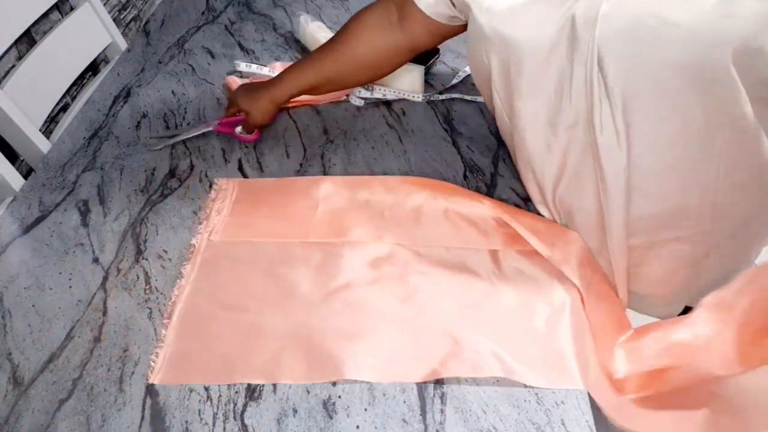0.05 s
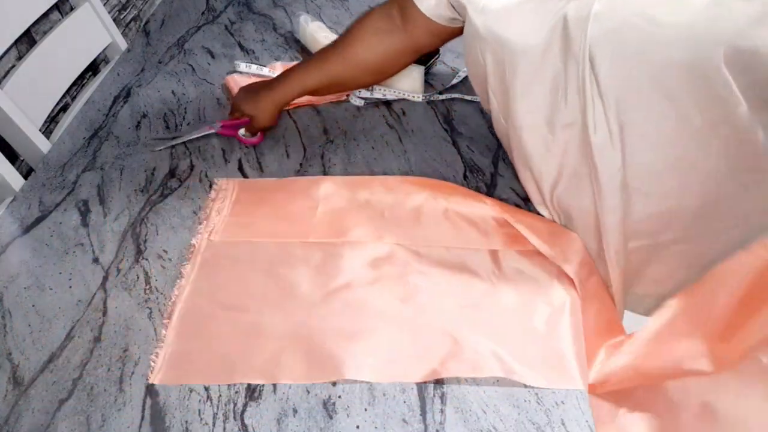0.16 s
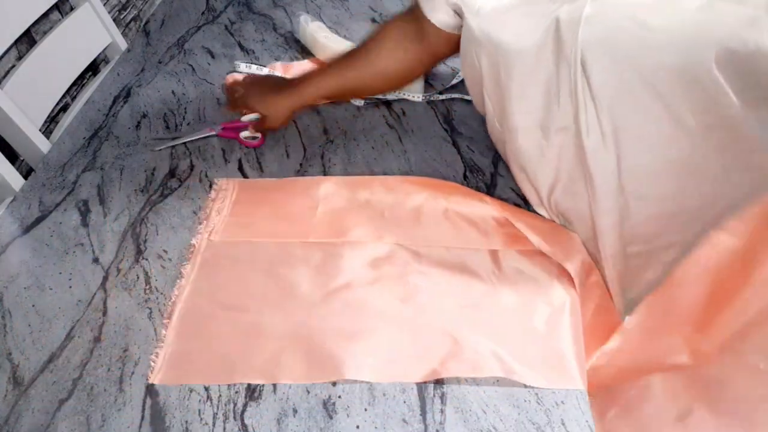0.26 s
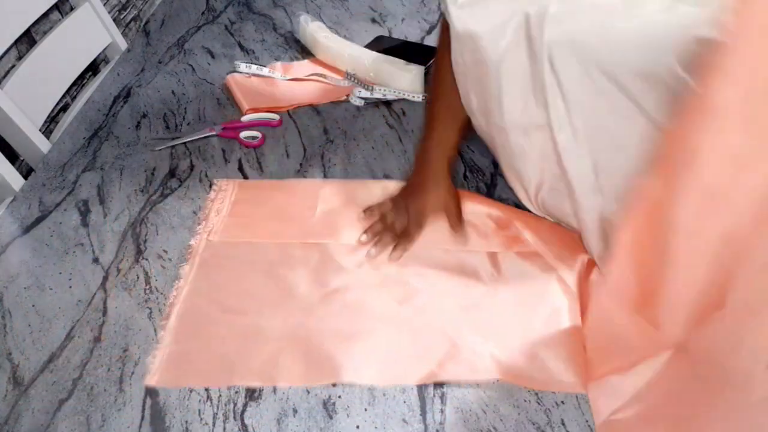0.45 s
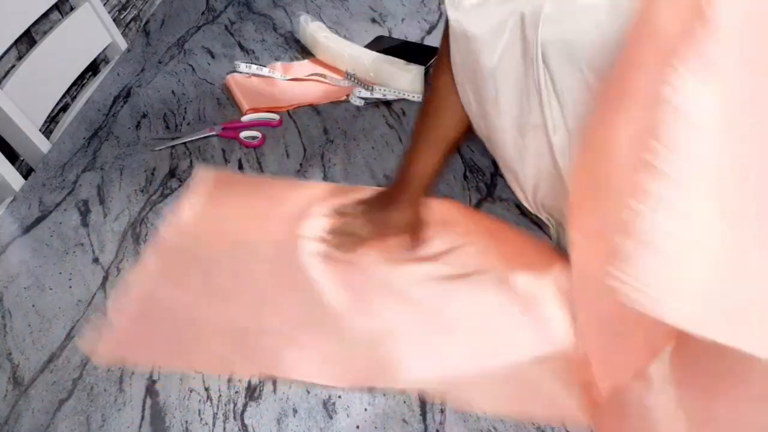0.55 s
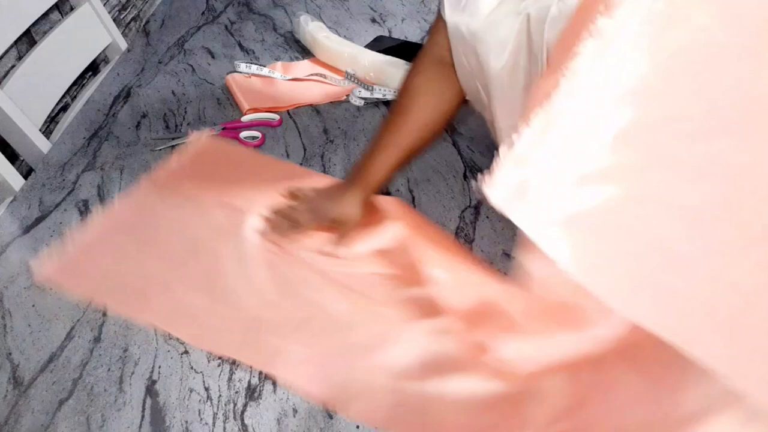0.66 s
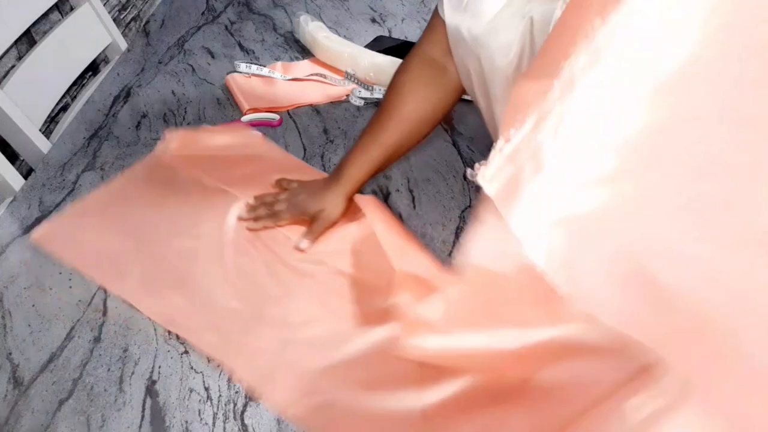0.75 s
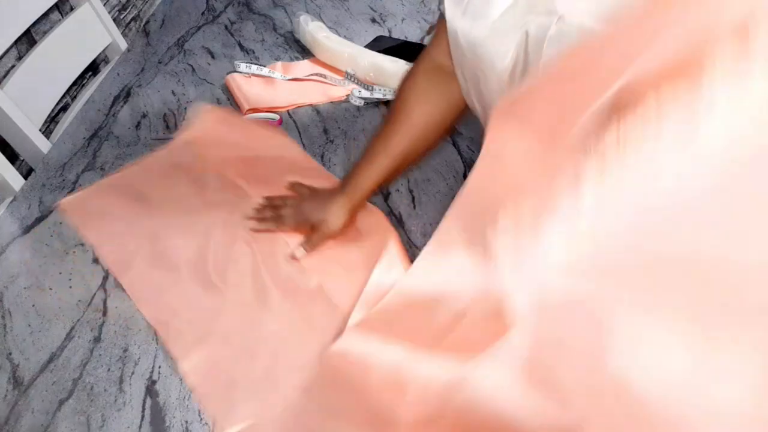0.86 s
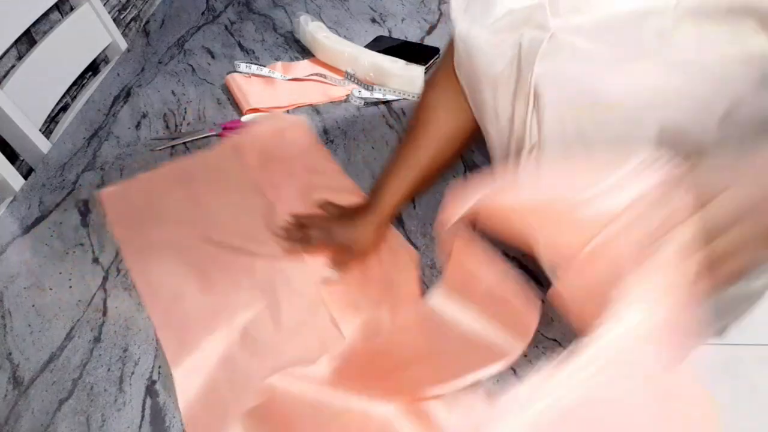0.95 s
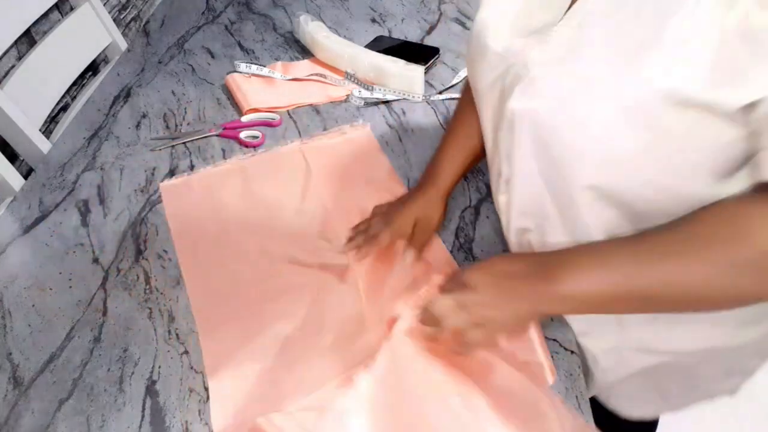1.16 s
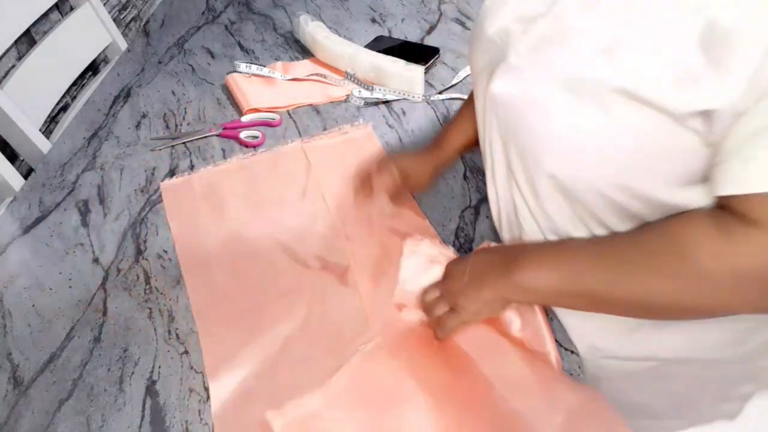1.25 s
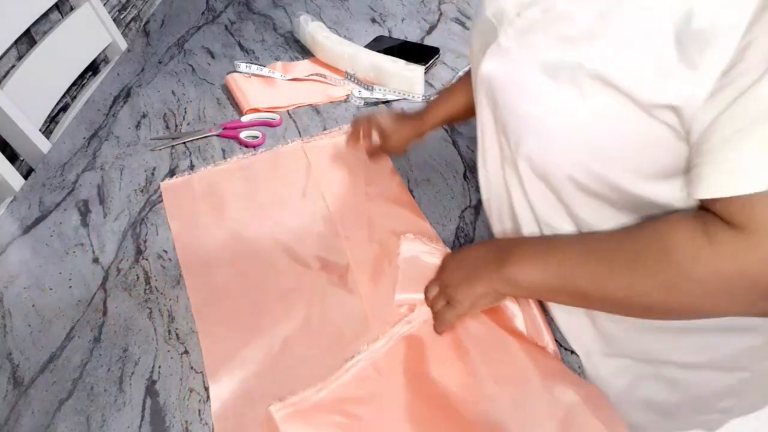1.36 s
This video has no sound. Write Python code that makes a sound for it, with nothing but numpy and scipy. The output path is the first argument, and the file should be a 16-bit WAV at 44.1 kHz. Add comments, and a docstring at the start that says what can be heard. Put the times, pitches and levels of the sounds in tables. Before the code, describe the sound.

Scissors are put down on a hard table: light metallic ticks at about 0.05 seconds, a loud flat clack at 0.21, small settling knocks at 0.25 and 0.34, with a bare-room echo. Stiff satin then drags with a grainy hiss and whistling rasp, strongest around 0.6-0.75, and again, softer, around 0.9-1.05. A faint finger brush comes near 1.28 over low hum.

```python
"""A bare, echoing room with a faint hum and rush: steel scissors with plastic handles are put down on a table.
They touch, drop flat with a clack and settle: noise cracks, damped modes of table and steel, decaying echo.
Stiff satin is then dragged across the table in two pulls: grainy noise hiss, and a weave rasp of noise bands
around a gliding pitch. A hand bearing on the table and fingers on the cloth's edge are soft noise swells."""
import sys
import numpy as np
from scipy import signal
from scipy.fft import rfft, irfft, next_fast_len
from scipy.io import wavfile
from scipy.ndimage import map_coordinates

SR = 44100
rng = np.random.default_rng(int(sys.argv[2]) if len(sys.argv) > 2 else 0)


def to_wav(sig):
    """Store sig (one row per channel, or 1-D mono) as 16-bit WAV at the path in sys.argv[1].

    Samples outside -1..1 are clipped; the rate is SR.
    """
    pcm = np.clip(np.atleast_2d(sig), -1, 1) * 32767
    pcm = np.round(pcm).astype(np.int16)
    wavfile.write(sys.argv[1], SR, pcm.T)  # frames by channels


N = 61740

# left-right likeness of the sound field: (frequency [Hz], correlation)
LIKENESS = [(60, 0.9), (130, 0.975), (290, 0.93), (640, 0.69), (1400, 0.05), (15000, 0.023)]


def amp(db):
    """Decibels to gain."""
    return 10 ** (np.asarray(db) / 20)


def unit(x):
    """Scaled to rms 1."""
    return x / np.sqrt(np.mean(x ** 2) + 1e-20)


def along(points, hz):
    """(Hz, value) points interpolated on a log frequency axis."""
    f, v = np.transpose(points)
    return np.interp(np.log(hz + 1), np.log(f + 1), v)


def clock():
    """The time of each sample [s]."""
    return np.arange(N) / SR


def curves(rows):
    """One value per sample for each column after the time."""
    s, *cols = np.transpose(rows)
    return [np.interp(clock(), s, c) for c in cols]


def wobble(knots_per_s):
    """A smooth random curve of rms 1."""
    knots = rng.standard_normal(N // 4)
    return unit(map_coordinates(knots, [clock() * knots_per_s + 2], mode="wrap"))


def filtered(x, response):
    """x times a response of frequency, zero-padded."""
    m = next_fast_len(N + 8192)
    return irfft(rfft(x, m) * response(np.fft.rfftfreq(m, 1 / SR)), m)[..., :N]


def half_angle(hz):
    """Half the left-right angle [rad] whose cosine is the likeness."""
    return np.arccos(np.clip(along(LIKENESS, hz), -1, 1)) / 2


def rush(spectrum, tilt=0):
    """Stereo noise of rms 1 as the room spreads it: alike in the bass, unrelated in the treble."""
    def response(hz):
        turn = half_angle(hz)
        colour = amp(along(spectrum, hz) + tilt * np.log2(1 + hz / 1000))
        return colour * [np.cos(turn), np.sin(turn)]
    mid, side = filtered(rng.standard_normal((2, N)), response)
    return unit(np.array([mid + side, mid - side]))


def room_tone():
    """Steady low sines for the hum and a faint stationary noise rush."""
    # (frequency [Hz], level [dB])
    hum_lines = [(48.4, -65), (59, -60.5), (142, -65)]
    # rush level [dB] and its spectrum: (frequency [Hz], level [dB])
    floor_db = -52
    floor_spectrum = [(20, -15), (60, -3), (150, -9.5), (400, -11.5), (1500, -18), (5000, -21),
                      (15800, -28)]
    hum = 0
    for hz, db in hum_lines:
        hum = hum + amp(db) * np.sqrt(2) * np.sin(2 * np.pi * (hz * clock() + rng.random()))
    return hum + amp(floor_db) * rush(floor_spectrum)


def touches(rows, tone):
    """Soft noise swells, each at half amplitude one half length from its peak."""
    return rush(tone) * sum(amp(db) / (1 + ((clock() - s) / half_s) ** 2) for s, db, half_s in rows)


def palm():
    """A hand bears on the table: dull, bass-heavy swells."""
    # (time [s], level [dB], half length [s])
    presses = [(.058, -36, 0.069), (.54, -49, 0.025), (.692, -42.5, 0.0079), (.76, -46.5, 0.078)]
    # (frequency [Hz], level [dB])
    palm_tone = [(50, -6), (90, -13), (125, 6.5), (200, -7), (350, -6), (700, -5.5), (2000, -38)]
    return touches(presses, palm_tone)


def brush():
    """Fingers brush the cloth's edge: a bright swell."""
    # (time [s], level [dB], half length [s])
    strokes = [(1.279, -47, 0.032)]
    # (frequency [Hz], level [dB])
    brush_tone = [(500, -25), (3000, -4), (7000, 4.5), (12000, 2.5), (15800, -0.5)]
    return touches(strokes, brush_tone)


def cloth_hiss():
    """Grainy friction of sliding satin, fluttering as folds pass, brighter when it is pulled harder."""
    # (time [s], level [dB])
    slide = [(.47, -72), (.51, -46.5), (.545, -34), (.6, -30.5), (.69, -30.5), (.75, -33.5), (.79, -37),
             (.825, -41.5), (.87, -36.5), (.92, -33), (1.02, -34.5), (1.08, -38.5), (1.15, -44),
             (1.21, -50.5), (1.27, -50), (1.4, -57.5)]
    # (frequency [Hz], level [dB])
    hiss_spectrum = [(40, -22), (130, -3), (220, -12), (400, -8.5), (700, -7), (1100, -0.5), (2200, 2.5),
                     (3800, -0.5), (5500, -2), (8200, -4.5), (9300, -8.5), (11500, -5), (15800, -9)]
    grain_db, grain_knots_per_s = 1.0, 410
    flutter_db, flutter_knots_per_s = .7, 45
    sheen_hz, sheen_db_per_db = 7100, 0.15
    level_db, = curves(slide)
    grain = np.array([wobble(grain_knots_per_s), wobble(grain_knots_per_s)])
    flutter = wobble(flutter_knots_per_s)
    hiss = rush(hiss_spectrum) * amp(grain_db * grain + flutter_db * flutter)
    sheen = filtered(hiss, lambda hz: 1 - 1 / (1 + (hz / sheen_hz) ** 4))
    sheen_gain = amp(sheen_db_per_db * (level_db - level_db.max()))
    return amp(level_db) * (hiss - sheen + sheen * sheen_gain)


def cloth_rasp():
    """Threads catch at a rate following the pull: a rough band and weak octave, ringing on in the room."""
    # (time [s], pitch [Hz], level [dB])
    pull = [(.5, 999, -63), (.555, 1080, -46), (.59, 1720, -39.5), (.63, 1620, -35.5), (.685, 1500, -31.5),
            (.72, 1540, -39.5), (.752, 1430, -34.5), (.79, 1420, -42), (.83, 1400, -44.5),
            (.88, 1200, -45.5), (.925, 1230, -41), (.97, 1380, -46.5), (1.02, 1600, -42.5),
            (1.08, 1600, -51), (1.2, 1600, -62.5), (1.4, 1500, -84)]
    # resonances that the rasp excites: (frequency [Hz], width [Hz], level [dB])
    sing = [(1410, 23, -0.5), (1608, 25, -0.5), (2740, 48, 9.5)]
    core_knots_per_s, skirt_knots_per_s = 290, 910
    skirt_db, octave_db, sing_db = 3, -8, -1
    echo_db, echo_t60_s = -3, .25
    pitch_hz, level_db = curves(pull)
    phase = 2 * np.pi * np.cumsum(pitch_hz) / SR

    def band(carrier, rate):
        def side():
            return wobble(rate) * np.cos(carrier) + wobble(rate) * np.sin(carrier)
        return np.array([side(), side()])

    def body(f):
        modes = sum(amp(db) * 1j * f * w / (c * c - f * f + 1j * f * w) for c, w, db in sing)
        return 1 + amp(sing_db) * modes

    rasp = band(phase, core_knots_per_s)
    rasp = rasp + amp(skirt_db) * band(phase, skirt_knots_per_s)
    rasp = rasp + amp(octave_db) * band(2 * phase, skirt_knots_per_s)
    rasp = amp(level_db) * unit(filtered(rasp, body))
    walls = rng.standard_normal((2, N)) * amp(-60 * clock() / echo_t60_s)
    walls = walls / np.linalg.norm(walls[0])
    return rasp + amp(echo_db) * signal.fftconvolve(rasp, walls, axes=1)[:, :N]


def ring(modes, age):
    """Damped modes wavering in phase; the higher ones reach left and right out of step."""
    rise_s, drift_rad, drift_knots_per_s = 0.0023, .3, 40
    out = np.zeros((2, N))
    for hz, db, t60 in modes:
        apart = half_angle(hz) * rng.choice([-1, 1]) * np.array([[1], [-1]])
        phase = apart + drift_rad * wobble(drift_knots_per_s)
        out += amp(db - 60 * age / t60) * np.sin(2 * np.pi * hz * age + phase)
    return out * (1 - np.exp(-age / rise_s))


def echo(noise, start):
    """Noise decaying per frequency, the early part louder and faintly uneven; the bass builds up later."""
    # (frequency [Hz], t60 [s])
    room_decay = [(80, 0.71), (250, 0.31), (600, 0.58), (1500, 0.55), (3900, 0.51), (7000, 0.46),
                  (14000, 0.33)]
    early_db, early_s = 1.5, 0.037
    ripple_db, ripple_knots_per_s = 0.5, 630
    split_hz, bass_rise_s, treble_rise_s = 1800, 0.0071, 0.0018
    hz, t, z = signal.stft(noise, SR, nperseg=256)
    fade = amp(-60 * np.maximum(t - start, 0) / along(room_decay, hz)[:, None])
    tail = signal.istft(z * fade, SR, nperseg=256)[1][:, :N]
    age = np.maximum(clock() - start, 0)
    early = 1 / (1 + (age / early_s) ** 10)
    tail = tail * amp(early * (early_db + ripple_db * wobble(ripple_knots_per_s)))
    bass = filtered(tail, lambda hz: 1 / (1 + (hz / split_hz) ** 4))
    treble = tail - bass
    return bass * (1 - np.exp(-age / bass_rise_s)) + treble * (1 - np.exp(-age / treble_rise_s))


def scissors():
    """Each contact cracks, rings table and steel, and fills the room; the level dips briefly once."""
    # (time [s], level [dB], brightness [dB per octave], table ring [dB], scissors ring [dB],
    #  handle clack [dB], crack [dB])
    contacts = [(-.004, -33, 0.5, -16, 4.5, -21, 12), (0.0425, -28.5, 1.7, -1, 3, 1, 10),
                (0.0529, -37.5, 8, 3, 4, -6, 16), (0.2106, -20, -5.5, -6.5, -17, -4.5, 12.5),
                (0.2126, -25, 5.5, -13, -21, 1, 13.5), (0.215, -9, 0.5, -2, -6, -12.5, 14.5),
                (.2188, -22.5, 8, -7.5, -7, -22, 12), (0.2521, -18, -8, -6, -4.5, -14, 19.5),
                (.3435, -33.5, 0.5, -10, 1, -1, 15.5)]
    # contact colour, and hollow clack of the handles: (frequency [Hz], level [dB])
    knock = [(35, -29), (70, -20.5), (120, -14.5), (220, -3.5), (400, -4), (900, -4), (1250, -0.5),
             (2100, -4.5), (2800, -6), (3800, -6.5), (5500, -11.5), (8200, -15), (9400, -22), (11500, -18),
             (15800, -26.5)]
    handle = [(900, -37), (1250, -12), (1530, 6.5), (2200, -8), (2850, -12), (3330, 0), (3700, -3),
              (4300, -6), (5000, -23), (9000, -44)]
    # modes of the table and of the scissors: (frequency [Hz], level [dB], t60 [s])
    table_modes = [(118.2, -1, 0.54), (373.5, -1.5, 0.47), (415, 2.5, 0.33), (511, -0.5, 0.44),
                   (602, -9.5, 0.45), (781.4, -1.5, 0.47), (804, -1, 0.43), (890, -1.5, 0.36),
                   (980, -16, 0.38), (1162, -0.5, 0.35), (1184, 0.5, 0.44), (1228, 1, 0.46),
                   (1384, -8, 0.32), (1656, -0.5, 0.33), (1677, -7, 0.24), (2390, 3, 0.2), (3086, -8, 0.4)]
    steel_modes = [(575, 4.5, 0.2), (745, -3.5, 0.25), (1079, -2, 0.32), (1470, 4.5, 0.2),
                   (1526, 8.5, 0.17), (1610, -0.5, 0.31), (1773, 2, 0.39), (1928, 1, 0.32),
                   (2016, -6, 0.81), (3310, 0.5, 0.33), (3680, -7, 0.23), (3750, -1, 0.2)]
    all_table_db, all_steel_db, echo_db = -8.5, -10.5, -1
    crack_decay_s, crack_band_hz = .0019, [2200, 11500]
    dip_s, dip_half_s, dip_db = .366, .004, -7  # half length to 1/e of the dip in dB
    crack_filter = signal.butter(1, crack_band_hz, "bandpass", fs=SR, output="sos")
    out = np.zeros((2, N))
    for start, db, tilt, table_db, steel_db, handle_db, crack_db in contacts:
        age = np.maximum(clock() - start, 0)

        def impact():
            return rush(knock, tilt) + amp(handle_db) * rush(handle)

        burst = impact() * (age > 0) * np.exp(-age / crack_decay_s)
        crack = signal.sosfilt(crack_filter, burst)
        tail = echo(impact(), start)
        modes = amp(all_table_db + table_db) * ring(table_modes, age)
        modes += amp(all_steel_db + steel_db) * ring(steel_modes, age)
        out += amp(db) * (amp(crack_db) * crack + amp(echo_db) * tail + modes)
    return out * amp(dip_db * np.exp(-((clock() - dip_s) / dip_half_s) ** 2))


def scene():
    """Room, hands, cloth and scissors, slightly to the left."""
    left_over_right_db = 1
    sound = room_tone() + palm() + brush() + cloth_hiss() + cloth_rasp() + scissors()
    return sound * amp(np.array([[left_over_right_db], [-left_over_right_db]]) / 2)


def record(dry):
    """The recorder rounds off the highest peaks and keeps nothing above its band limit."""
    overload, top_hz = 0.79, 15900
    rounded = dry / (1 + np.abs(dry / overload) ** 6) ** (1 / 6)
    return filtered(rounded, lambda hz: np.clip((top_hz - hz) / 200 + .5, 0, 1))


dry = scene()
out = record(dry)
to_wav(out)
```